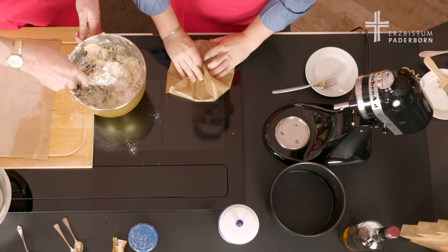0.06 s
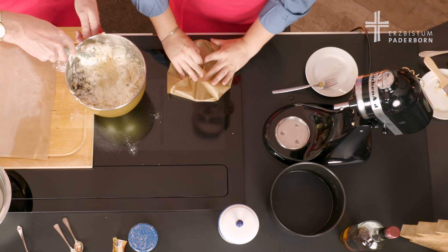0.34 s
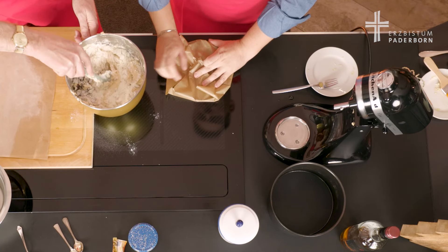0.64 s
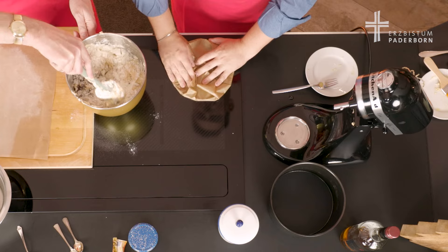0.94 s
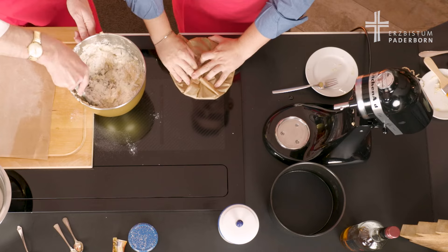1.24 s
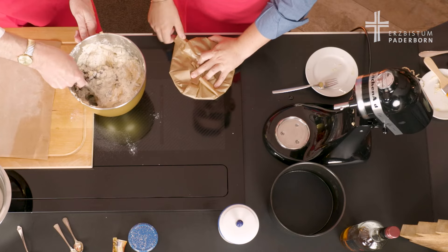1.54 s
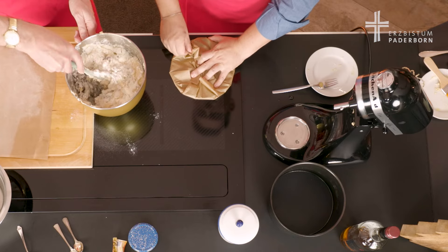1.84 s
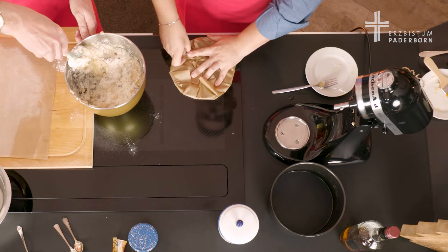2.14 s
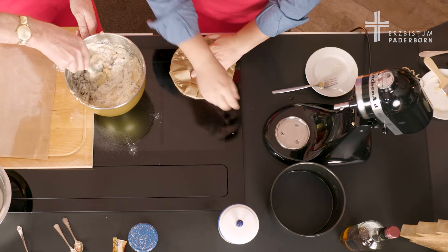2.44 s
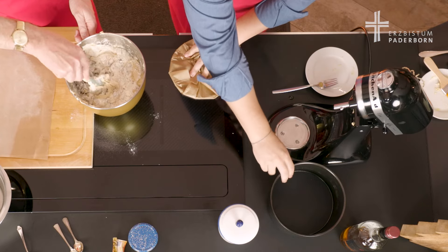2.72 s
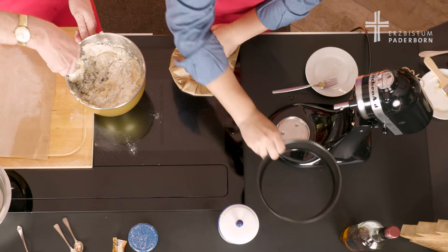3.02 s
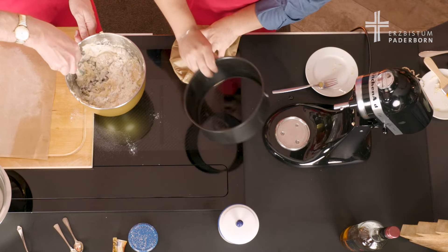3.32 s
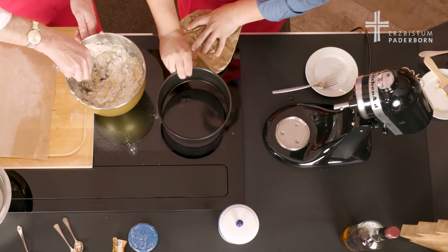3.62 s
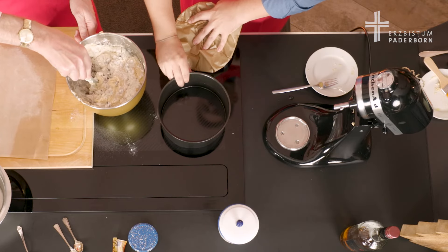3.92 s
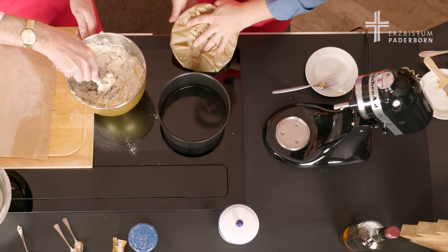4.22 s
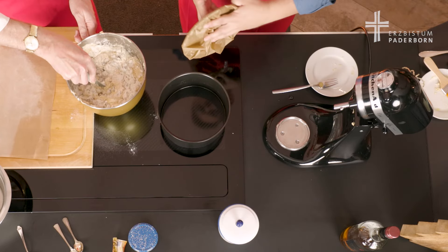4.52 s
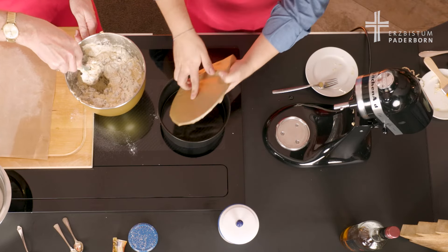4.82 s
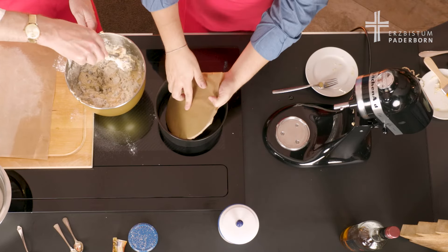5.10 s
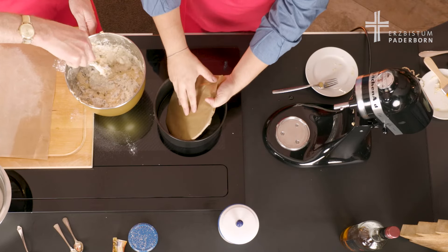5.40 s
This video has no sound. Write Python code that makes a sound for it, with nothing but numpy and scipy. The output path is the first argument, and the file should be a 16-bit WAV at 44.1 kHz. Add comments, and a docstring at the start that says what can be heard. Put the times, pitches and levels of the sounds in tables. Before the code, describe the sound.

Close, crisp crackling of baking paper in a kitchen, with two metal knocks from a cake tin and a short scrape.

```python
"""A kitchen worktop, heard from close by; the room answers briefly over a faint steady noise.
First, hands press baking paper round the base of a cake tin: it crinkles in strokes, single creases snap.
Near 3 s the tin's steel ring is fetched, with clinks and light taps, and a sleeve passes the microphone.
Just before 4 s the ring is set down with two knocks, and the paper crinkles again.
From 5 s the papered base is pushed into the ring, scraping as it slides down."""
import sys
import numpy as np
from scipy import signal
from scipy.fft import rfft, irfft, next_fast_len
from scipy.io import wavfile
from scipy.ndimage import uniform_filter1d, map_coordinates

SR = 44100
rng = np.random.default_rng(int(sys.argv[2]) if len(sys.argv) > 2 else 0)


def file_out(sig):
    """Save sig as 16-bit WAV at sys.argv[1]."""
    # one column per channel
    cols = np.atleast_2d(sig).T
    # limit, then scale
    lim = np.clip(cols, -1, 1)
    pcm = np.round(lim * 32767).astype(np.int16)
    wavfile.write(sys.argv[1], SR, pcm)


N = 249353

# the kitchen's steady noise: frequency_hz, level_db
ROOM_TONE_SPECTRUM = [(20, -39), (80, 3), (260, 2), (450, -2.5), (2000, -11), (10000, -50), (16000, -36)]
# the kitchen's reverberation time: frequency_hz, t60_s
ROOM_DECAY = [(150, 0.47), (700, 0.75), (3000, 0.46), (12000, 0.18)]
# cloth brushing past the microphone: time_s, level_db
SLEEVE_LEVELS = [(3.05, -71), (3.3, -51), (3.55, -46), (3.72, -64)]
# the rustle of that cloth: frequency_hz, level_db
CLOTH_SPECTRUM = [(500, -16), (2000, -22), (6000, -3), (12000, 4), (16000, -2)]
# hands bumping on the worktop: frequency_hz, level_db
BUMP_SPECTRUM = [(25, -34), (50, -19), (80, -0.5), (130, 0), (250, -4.5), (400, -7), (900, -20.5),
                 (3000, -80)]
# thin, high squeaks: start_s, length_s, top_pitch_hz, level_db
SQUEAKS = [(.72, .13, 13500, -60), (2.56, .17, 15300, -54), (4.26, 0.18, 13500, -58),
           (4.6, .13, 13600, -61)]
# the base sliding down the ring: time_s, level_db
SCRAPE_LEVELS = [(5.03, -68), (5.12, -45), (5.25, -52.5), (5.31, -43.5), (5.35, -56.5), (5.47, -48.5),
                 (5.6, -40), (5.65, -53)]
# resonances of the base held in the ring: pitch_hz, width_hz, level_db
HOLLOW_MODES = [(484, 61, 1.5), (905, 200, -12), (1590, 160, -21), (1990, 63, -14)]
# fingertips on the ring as it is picked up: start_s, level_db, pitch_hz
CLINKS = [(2.9163, -15, 1364), (3.137, -28, 1640)]
# modes of the steel ring on the worktop: pitch_hz, level_db, t60_s
RING_MODES = [(112.3, -14, 0.35), (174, -7.5, 0.26), (256, -6, 0.27), (364, -6, 0.19), (502, -1, 0.25),
              (657, -2.5, 0.15), (887, 2, 0.069), (1118, 3, 0.12), (1447, -9, 0.19), (1743, 1, 0.082),
              (1823, 6, 0.045), (2465, -6, 0.063), (2850, -34, 0.14), (3950, -12, 0.19), (4730, -6.5, 0.14),
              (4980, -5, 0.12), (5900, -1, 0.078), (6800, 6.5, 0.066), (7480, 16, 0.019), (8260, 7, 0.062),
              (9000, 9, 0.061)]
# knocks on tin and worktop: start_s, thud_db, thud_hz, ring_db, brightness_hz
KNOCKS = [(1.43, -36.5, 133, -44, 600), (1.631, -32.5, 370, -30.5, 700), (2.877, -32, 680, -52, 800),
          (2.902, -33.5, 487, -51, 700), (3.508, -34, 600, -59, 800), (3.8425, -13, 690, -24, 23000),
          (3.9905, -10.5, 553, -21.5, 5900), (3.9936, -22, 990, -24, 7800),
          (4.7199, -24.5, 654, -40.5, 1200), (4.821, -38, 156, -54, 1200), (5.012, -43, 168, -54, 1200),
          (5.069, -23.5, 734, -34, 1290), (5.102, -28, 660, -32, 895), (5.305, -30, 605, -64, 900),
          (5.484, -27, 447, -39, 1480)]
# the baking paper's crinkle: frequency_hz, level_db
PAPER_SPECTRUM = [(40, -20), (90, -8), (200, -7.5), (370, -6), (750, 0), (1100, -1), (1800, 2.5),
                  (3300, 1.5), (5600, 1.5), (13300, -2.5), (16000, -7)]
# hand strokes on the paper: start_s, length_s, crinkle_db, hollow_db, bump_db, crisp_db
STROKES = [(0, .19, -35, -4, -59, -5), (0.279, .07, -39, -3.5, -53, -3.5),
           (.415, .145, -33, -5, -50.5, -3.5), (.615, .065, -32, -9, -43, -5.5),
           (0.866, .35, -33, -3, -52.5, -3), (1.252, .19, -37, -6, -58, -3),
           (1.48, .07, -47, -5.5, -50.5, -2.5), (1.698, .1, -31, -4.5, -55, -6),
           (1.861, .15, -36, -4.5, -71, -3.5), (2.09, .04, -45, -5, -60, -4.5),
           (2.181, .115, -40, -6, -74, -4), (2.47, .1, -51, 2, -53, -7), (2.6, .14, -38, -5, -44.5, -7.5),
           (2.8, .15, -49, 3.5, -58, -3.5), (3.1, .28, -55, -2.5, -51.5, -7),
           (3.42, .08, -45, -6, -52.5, -14), (3.54, .19, -52, -1, -68, -9),
           (4.022, .33, -55, -10, -58.5, -10), (4.41, .075, -43, -6, -56, -4),
           (4.686, .07, -44, -1.5, -54.5, -2.5), (5.01, .12, -45, -25, -52, -7),
           (5.205, .11, -43, -10, -59, -5), (5.38, .07, -46, -4, -59, -4), (5.48, .17, -40, -15, -56.5, -4)]
# whole folds collapsing under a finger: start_s, length_s, crinkle_db
CRUNCHES = [(0, .032, -28), (0.086, .05, -30), (.148, .03, -28), (.305, .013, -30), (.442, .043, -28),
            (.645, .027, -27), (.866, .026, -24), (1.031, .013, -27), (1.2, .018, -29), (1.768, .022, -28),
            (1.971, .022, -33), (2.679, .016, -32), (4.42, .018, -37)]
# sharp snaps of paper creases, and a few light taps on the tin:
# start_s, level_db, pitch_hz, relative_crack_db
SNAPS_AND_TAPS = [(0.0974, -9, 1950, -27), (0.1817, -7, 1170, -29), (0.2184, -19, 3950, -4.5),
                  (.262, -17.5, 3500, -6), (0.362, -36, 4500, 4), (0.4933, -16.5, 2230, -4),
                  (.5444, -13, 3130, -7), (0.6168, -15, 7300, -12), (.886, -12, 1520, -14),
                  (1.032, -12.5, 1320, -5), (1.0837, -17, 3960, -9), (1.1766, -17, 3900, -5),
                  (1.2917, -12, 1600, -10), (1.3977, -19, 3960, -1.5), (1.4305, -15.5, 3940, -4.5),
                  (1.479, -20.5, 4000, -7), (1.539, -22, 4020, -9.5), (1.6584, -19, 1940, -4.5),
                  (1.6902, -11, 2230, -15.5), (1.7523, -9.5, 2410, -17), (1.7853, -16, 3280, -5.5),
                  (1.956, -11.5, 2100, -14), (2.0014, -14.5, 2040, -7), (2.0393, -17, 3960, -14),
                  (2.0592, -20, 3170, -7.5), (2.148, -13, 4440, -18), (2.2844, -14, 1960, -12),
                  (2.3285, -20, 3480, -10), (2.4337, -26, 6600, -7.5), (2.4511, -17.5, 2930, -7.5),
                  (2.549, -13.5, 2320, -15.5), (2.697, -11.5, 3450, -15), (2.7139, -17, 1960, -9.5),
                  (2.817, -16, 3550, -13), (2.8443, -22.5, 3800, -15), (2.9997, -23, 2360, -20),
                  (3.1156, -22, 2640, -13), (3.3816, -17, 1750, -17), (3.4725, -29.5, 3600, -1),
                  (3.674, -20, 4030, -43), (3.7, -24.5, 1660, -17), (3.8935, -22, 4500, -10),
                  (3.9035, -23, 5000, -13), (3.9317, -16, 1270, -13.5), (4.1835, -24, 2300, -27),
                  (4.1997, -26.5, 2060, -13.5), (4.3184, -25.5, 3000, -31), (4.3481, -25, 2000, -11),
                  (4.4061, -19.5, 2170, -13.5), (4.4628, -16, 4400, -13), (4.5226, -20, 4020, -18),
                  (4.7207, -17.5, 5630, -15), (4.732, -21, 6650, -5), (4.821, -28.5, 5360, 2),
                  (4.961, -32.5, 8240, -17), (5.0092, -26.5, 7600, -3), (5.483, -13, 7200, -12.5),
                  (5.5384, -20, 1970, -7.5), (5.5671, -14.5, 6400, -16.5)]


def amp(db):
    return 10 ** (np.asarray(db) / 20)


def unit_rms(x):
    return x / np.sqrt(np.mean(x ** 2, axis=-1, keepdims=True) + 1e-20)


def curve_at(points, hz):
    """Reads (frequency_hz, value) points along a log frequency axis."""
    freqs, values = np.transpose(points)
    return np.interp(np.log(hz + 1), np.log(freqs + 1), values)


def envelope(points):
    """Gain per sample from (time_s, level_db) points, fading out 30 ms beyond each end."""
    times, db = np.transpose(points)
    times = np.r_[times[0] - .03, times, times[-1] + .03]
    return amp(np.interp(np.arange(N) / SR, times, np.pad(db, 1, constant_values=-120)))


def filtered(x, response):
    """x through a complex frequency response."""
    n = x.shape[-1]
    padded = next_fast_len(n + n // 8, real=True)
    return irfft(rfft(x, padded) * response(np.fft.rfftfreq(padded, 1 / SR)), padded)[..., :n]


def resonance(f, hz, width):
    """Causal response of one mode."""
    return 1j * f * width / (hz * hz - f * f + 1j * f * width)


def coloured_noise(spectrum):
    return unit_rms(filtered(rng.standard_normal(N), lambda f: amp(curve_at(spectrum, f))))


def placed(times, sounds):
    """Sum of short sounds, one a row, each starting at its time."""
    at = np.round(times * SR).astype(int)[:, None] + np.arange(sounds.shape[1])
    return np.bincount(at.ravel(), sounds.ravel(), N)[:N]


def steadied(x, seconds):
    """Evens out slow swells, leaving only the grain."""
    n = max(int(seconds * SR), 2)
    return x / np.sqrt(np.abs(uniform_filter1d(uniform_filter1d(x ** 2, n), n)) + 1e-12)


def buckles(per_s, spread_db, cycles, life_s, crack, facets=4):
    """Tiny folds give way at random; each cracks and rings a few facets for some cycles."""
    expected = np.cumsum(per_s * np.ones(N)) / SR
    count = int(expected[-1])
    t = np.arange(SR // 130) / SR
    chance = rng.random((count, facets + 2))
    starts = np.searchsorted(expected, chance[:, 0] * expected[-1]) / SR
    size = amp(spread_db * np.minimum(-np.log(1 - chance[:, 1]), 3))
    folds = crack * rng.standard_normal((count, len(t))) * np.exp(-t / life_s)
    for draw in chance[:, 2:].T:
        hz = 500 * 32 ** draw[:, None]  # 500 Hz to 16 kHz
        folds += np.sqrt(hz / 4000) * np.sin(2 * np.pi * hz * t) * np.exp(-t * (hz / cycles + 200))
    return placed(starts, folds * size[:, None])


def strokes(levels_db, attack_db_per_s=620.5, release_db_per_s=330, settle_db=-14, settle_db_per_s=90):
    """Gain of the strokes: fingers bear down, hold and let go, then the paper settles faintly."""
    start, length = np.transpose(STROKES)[:2, :, None]
    t = np.arange(0, N, SR // 1000) / SR
    before, after = np.maximum(start - t, 0), np.maximum(t - start - length, 0)
    fall_db = np.maximum(-release_db_per_s * after, settle_db - settle_db_per_s * after)
    level_db = np.max(levels_db[:, None] - attack_db_per_s * before + fall_db, axis=0)
    return amp(np.interp(np.arange(N) / SR, t, level_db))


def room_tone(level_db=-59.5):
    """The kitchen's faint, low, steady noise."""
    return amp(level_db) * coloured_noise(ROOM_TONE_SPECTRUM)


def kitchen_reverb(x):
    """A short diffuse tail reaches the microphone 5 ms late and dies fastest in the treble."""
    hz, t, spectra = signal.stft(rng.standard_normal(SR // 2), SR, nperseg=256)
    decay = amp(-60 * t / curve_at(ROOM_DECAY, hz)[:, None])
    tail = signal.istft(spectra * decay, SR, nperseg=256)[1]
    return signal.fftconvolve(x, np.pad(tail / np.linalg.norm(tail), (SR // 200, 0)))[:N]


def sleeve(gain_db=-4):
    """Cloth brushes past close to the microphone."""
    return amp(gain_db) * envelope(SLEEVE_LEVELS) * coloured_noise(CLOTH_SPECTRUM)


def hand_bumps(gain_db=1):
    """The hands bump softly on the worktop with each stroke."""
    grain = buckles(per_s=200, spread_db=4.5, cycles=2.2, life_s=0.0058, crack=6.2)
    bumps = filtered(grain, lambda f: amp(curve_at(BUMP_SPECTRUM, f)))
    bump_db = np.transpose(STROKES)[4]
    return amp(gain_db) * strokes(bump_db) * steadied(bumps, 0.19)


def squeaks(arch=.06, jitter=0.048):
    """Each thin squeak swells and fades while its pitch arches."""
    t = np.arange(N) / SR
    out = np.zeros(N)
    for start, length, hz, db in SQUEAKS:
        on = (t > start) & (t < start + length)
        swell = np.sin(np.pi * (t[on] - start) / length)
        pitch = hz * (1 - arch * (1 - swell) + jitter * rng.standard_normal(SR // 2)[:on.sum()])
        out[on] += amp(db) * swell * np.sin(2 * np.pi * np.cumsum(pitch) / SR)
    return out


def base_scrape(gain_db=-1):
    """The papered base rubs down the ring and sounds the tin's hollow."""
    rub = steadied(buckles(per_s=280, spread_db=7.0, cycles=4.2, life_s=0.0021, crack=0.81), 0.04)
    hollow = lambda f: sum((-1) ** k * amp(db) * resonance(f, hz, width)
                           for k, (hz, width, db) in enumerate(HOLLOW_MODES))
    return amp(gain_db) * envelope(SCRAPE_LEVELS) * unit_rms(filtered(rub, hollow))


def ring_clinks(upper_ratio=2.66, upper_db=-7, life_s=0.0018, rise_s=0.00045):
    """The gripped steel gives two modes that the hand damps at once."""
    start, db, hz = np.transpose(CLINKS)[:, :, None]
    t = np.arange(SR // 30) / SR
    shape = (1 - np.exp(-t / rise_s)) * np.exp(-t / life_s)
    shape /= shape.max()
    lower = shape * np.sin(2 * np.pi * hz * t)
    upper = amp(upper_db) * shape ** 2 * np.sin(2 * np.pi * upper_ratio * hz * t)
    return placed(start[:, 0], amp(db) * (lower + upper))


def tin_knocks(clatter_db=6.0, clatter_life_s=0.0067, rise_s=0.00029, thud_cycles=0.53, rattle=0.68):
    """Each knock thuds and rings the steel, which chatters on the worktop; soft contacts sound dull."""
    start, thud_db, thud_hz, ring_db, brightness_hz = np.transpose(KNOCKS)[:, :, None]
    t = np.arange(SR // 4) / SR
    ring = np.zeros((len(start), len(t)))
    chatter = np.cumsum(rng.standard_normal(ring.shape), axis=1) / np.sqrt(SR)
    for hz, db, t60 in RING_MODES:
        scatter_db, phase = rng.standard_normal((2, len(start), 1))
        chatter = np.roll(chatter, 1, axis=0)
        drift = rattle * chatter / np.sqrt(t60 / 2)  # a wandering phase blurs each mode
        ring += amp(db + scatter_db - 60 * t / t60) * np.sin(2 * np.pi * (hz * t + phase + drift)) / 2
    clatter = amp(clatter_db) * rng.standard_normal(ring.shape) * np.exp(-t / clatter_life_s) / 2
    softened = lambda x: filtered(x, lambda f: 1 / (1 + 1j * f / brightness_hz) ** 2)
    contact = (softened(ring) + clatter) * (1 - np.exp(-t / rise_s))
    steel = softened(contact)  # a broad contact also damps the ringing
    thud_age = t * thud_hz / thud_cycles
    thud = np.sin(2 * np.pi * thud_hz * t) * thud_age * np.exp(1 - thud_age)
    return placed(start[:, 0], amp(ring_db) * steel + amp(thud_db) * thud)


def paper_ticks(gain_db=-21, follow=0.55, low_cut_hz=1500):
    """Small creases tick at random, louder while the hands press."""
    clicks = buckles(per_s=35, spread_db=7.0, cycles=3.4, life_s=0.0018, crack=0.93)
    clicks = filtered(clicks, lambda f: 1j * f / (low_cut_hz + 1j * f) * amp(curve_at(PAPER_SPECTRUM, f)))
    crinkle_db = np.transpose(STROKES)[2]
    return amp(gain_db) * strokes(crinkle_db) ** follow * clicks


def snaps_and_taps(tone_db=-3.5, crack_db=7.0, crack_hz=9000, push_db=-2, push_hz=650):
    """A crease flips or the tin is tapped: a brief burst rings the spot, with a crack and a low push."""
    start, db, hz, relative_crack_db = np.transpose(SNAPS_AND_TAPS)[:, :, None]
    t = np.arange(SR // 30) / SR
    decay = np.exp(-t / 0.0019) + 0.077 * np.exp(-t / 0.005)  # a fast drop, then a faint tail
    shape = (1 - np.exp(-t / 0.00026)) * decay
    shape /= shape.max()
    burst = rng.standard_normal((len(start), len(t))) * shape
    ring_rms = np.sqrt(np.mean(shape ** 2)) / 2
    ring = lambda pitch, width: ring_rms * unit_rms(filtered(burst, lambda f: resonance(f, pitch, width)))
    tone = filtered(ring(hz, hz), lambda f: resonance(f, hz, hz))  # a small area radiates little bass
    crack = amp(crack_db) * ring(crack_hz, width=20000) + amp(push_db) * ring(push_hz, width=860)
    return placed(start[:, 0], amp(db) * (amp(tone_db) * tone + amp(relative_crack_db) * crack))


def finger_pressure(ramp_s=.004, catch_db=2, catches_per_s=55, rest_db=-62):
    """Strength of the crinkle: strokes catch and slip unevenly, crunches swell and die quickly."""
    t = np.arange(N) / SR
    crunch = np.zeros(N)
    for start, length, db in CRUNCHES:
        swell = np.clip((t - start) / ramp_s, 0, 1)
        crunch += amp(db) * swell * np.exp(-np.maximum(t - start - length, 0) / ramp_s)
    catching = map_coordinates(rng.standard_normal(SR // 20), [t * catches_per_s], mode='wrap')
    crinkle_db = np.transpose(STROKES)[2]
    pressing = np.hypot(strokes(crinkle_db), amp(rest_db))  # the fingers never quite leave the paper
    return np.maximum(pressing * amp(catch_db * catching), crunch)


def facet_colour(x, resonance_db=3.0, q=5):
    """The facet under the fingers colours the crinkle; its pitch glides between the snaps and taps."""
    start, _, pitch_hz, _ = np.transpose(SNAPS_AND_TAPS)
    f, t, spectra = signal.stft(x, SR, nperseg=256)
    centre = np.interp(t, start, pitch_hz)
    gain = np.hypot(1, amp(resonance_db) * np.abs(resonance(f[:, None], centre, centre / q)))
    return unit_rms(signal.istft(spectra * gain, SR, nperseg=256)[1][:N])


def paper_crinkle(mid_db=-5, low_db=-4, peak_buckles_per_s=2000, stick_db=-51):
    """More pressure sets off more and louder buckles: the broad sheet sounds hollow, small facets crisp."""
    force = finger_pressure()
    start, length, _, hollow_db, _, crisp_db = np.transpose(STROKES)
    stroke_gain = lambda db: amp(np.interp(np.arange(N) / SR, start + length / 2, db))
    per_s = peak_buckles_per_s * (force / force.max()) ** .6
    shower = steadied(buckles(per_s, spread_db=3.0, cycles=11, life_s=0.0018, crack=1.0), 0.029)
    grab = force / amp(stick_db)  # under light pressure the paper slides smoothly instead of buckling
    shower = (grab * shower + rng.standard_normal(N)) / np.hypot(grab, 1)
    above = lambda f, hz: 1 / (1 + (hz / (f + 1)) ** 4)

    def band(low_hz, high_hz):
        response = lambda f: amp(curve_at(PAPER_SPECTRUM, f)) * (above(f, low_hz) - above(f, high_hz))
        return unit_rms(filtered(shower, response))

    hollow = amp(low_db) * stroke_gain(hollow_db) * band(40, 1400)
    crackle = amp(mid_db) * facet_colour(band(1400, 5500))
    crisp = stroke_gain(crisp_db) * band(5500, 30000)
    return force * (hollow + crackle + crisp)


def scene():
    """Paper and tin close to the microphone, the kitchen behind them."""
    handling = paper_crinkle() + snaps_and_taps() + paper_ticks() + base_scrape() + squeaks()
    knocks = tin_knocks()
    clinks = ring_clinks()
    reverb = kitchen_reverb(amp(-16.5) * handling + amp(-20.5) * clinks + amp(-10.5) * knocks)
    return handling + clinks + knocks + reverb + hand_bumps() + sleeve() + room_tone()


def record(dry, low_cut_hz=55, top_hz=16100):
    """The microphone sheds the deep bass, and the treble ends steeply at the band limit."""
    dry = signal.sosfilt(signal.butter(2, low_cut_hz, 'high', fs=SR, output='sos'), dry)
    return filtered(dry, lambda f: 1 / (1 + np.minimum(f / top_hz, 2) ** 200))


dry = scene()
out = record(dry)
file_out(out)
```